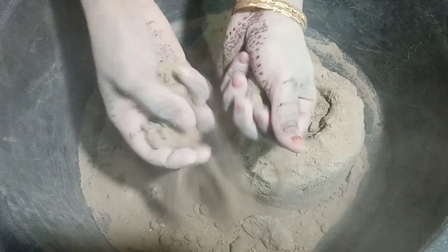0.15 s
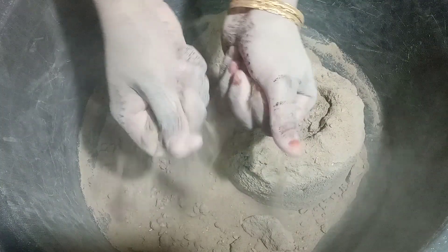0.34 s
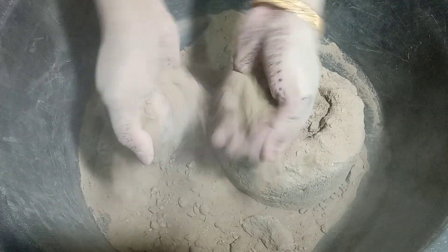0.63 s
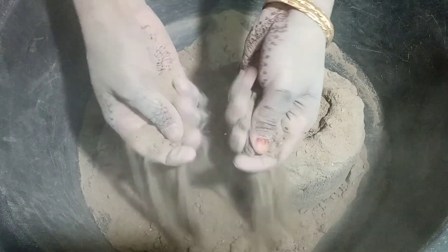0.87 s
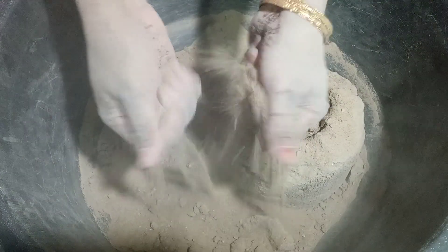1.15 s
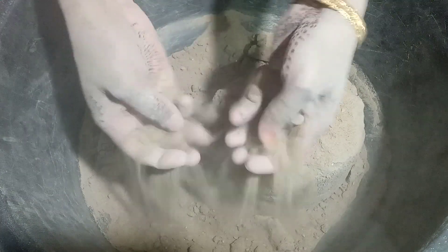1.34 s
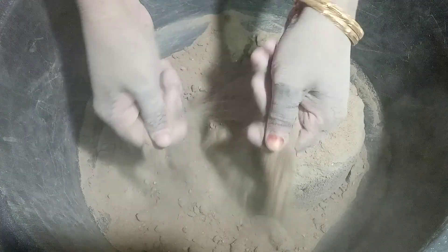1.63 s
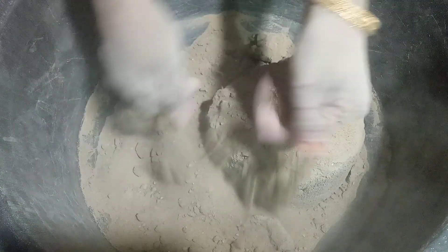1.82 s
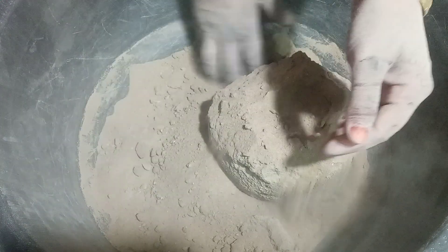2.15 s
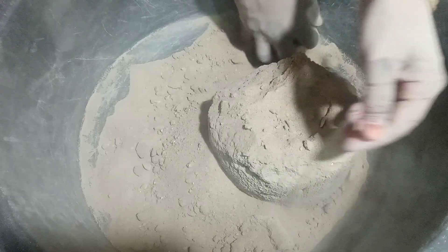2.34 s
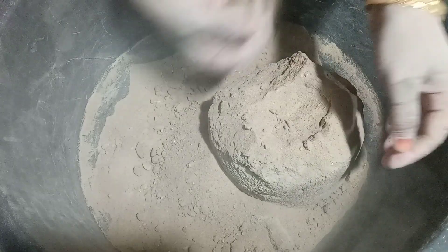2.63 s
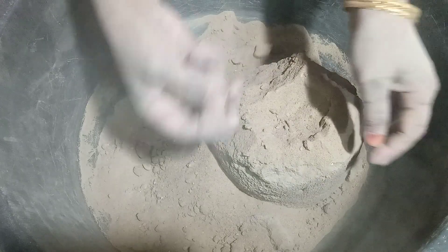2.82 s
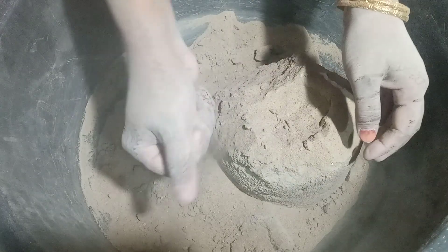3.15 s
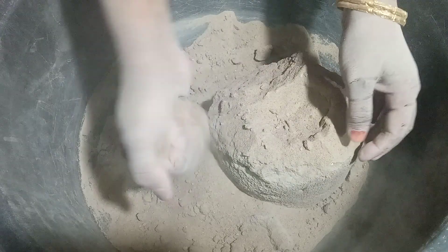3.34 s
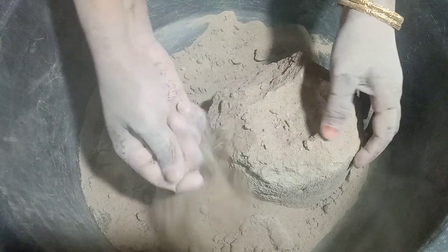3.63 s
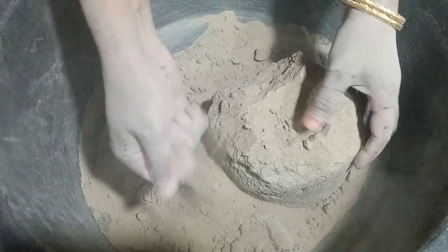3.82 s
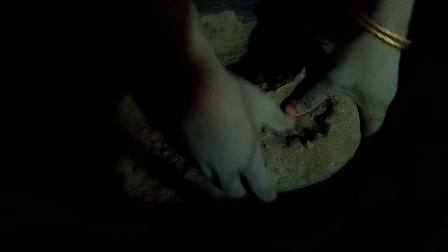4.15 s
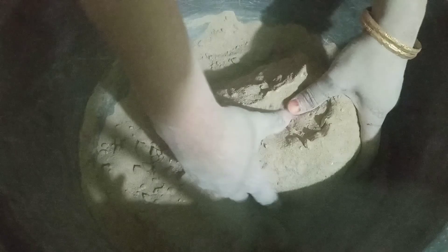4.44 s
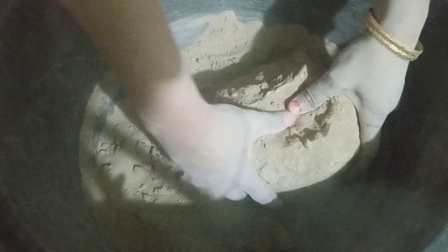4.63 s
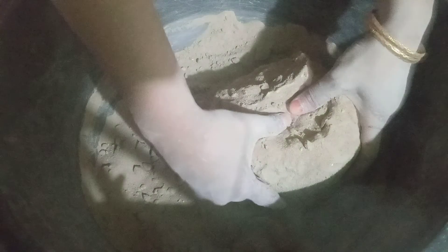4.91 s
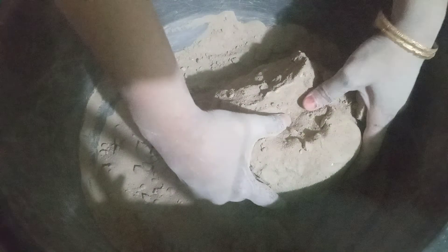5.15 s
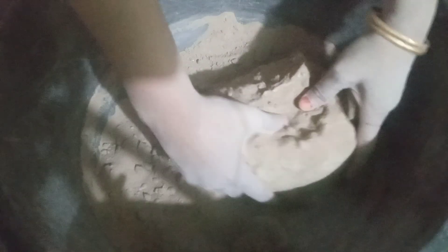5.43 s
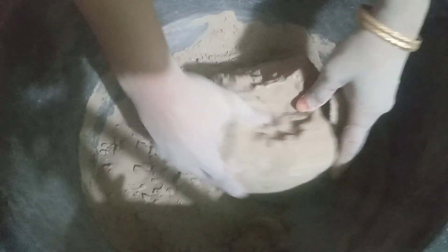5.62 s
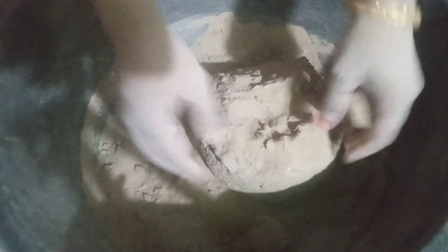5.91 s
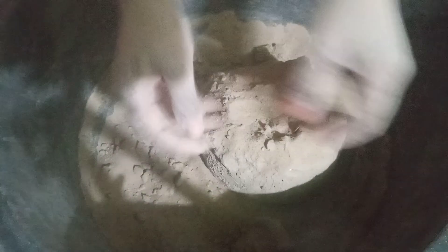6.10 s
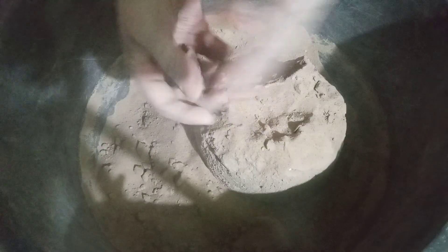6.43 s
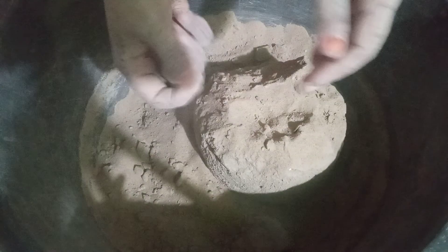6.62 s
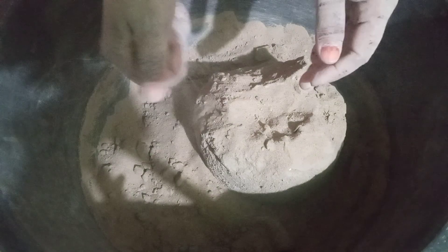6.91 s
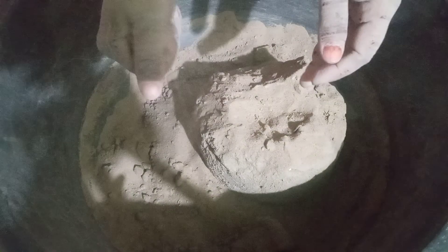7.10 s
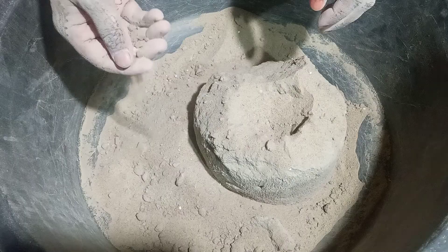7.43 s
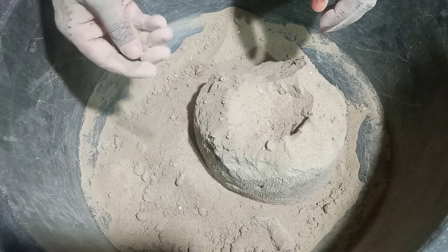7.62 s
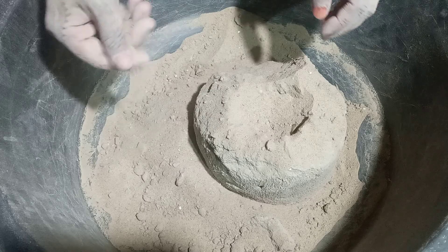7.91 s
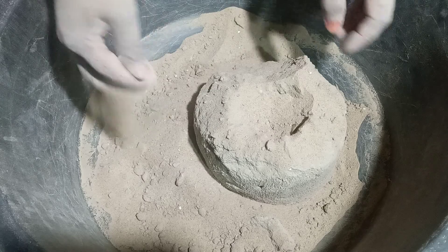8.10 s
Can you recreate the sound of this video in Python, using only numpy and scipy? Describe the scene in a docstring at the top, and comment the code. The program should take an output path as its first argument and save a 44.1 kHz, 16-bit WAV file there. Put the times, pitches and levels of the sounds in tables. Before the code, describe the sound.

Dry grit sifts between two palms in uneven bright swishes, with crumbs pattering and a few hard lump knocks ringing a plastic tub. The patter is thickest just after two seconds, then thins to light rubbing. Near five seconds comes a dense cluster of cracks and dull thuds, then delicate brushing, near silence and one small tick. Close indoor pickup, very short reverberation, low steady hum.

```python
"""Hands crumble dry sand over a plastic tub in a quiet room, close to a small microphone.
Fine grit hisses between the palms and crumbs patter on the heap: both are clumped random clicks,
coloured by filters and swelling with each move. Lumps crack in short bursts of slips that ring the tub,
and smooth pushes thump its low modes. A low room hum of drifting noise lies underneath."""
import sys
import numpy as np
from scipy import signal
from scipy.io import wavfile
from scipy.ndimage import uniform_filter1d

SR = 44100
rng = np.random.default_rng(int(sys.argv[2]) if len(sys.argv) > 2 else 0)


def gain_from_db(level_db):
    """Convert decibel levels to linear amplitude factors (20 dB per decade)."""
    decades = np.asarray(level_db, float) / 20
    return 10 ** decades


def store_wav(level_fs):
    """Save 16-bit WAV to argv[1]."""
    pcm = np.round(np.clip(np.atleast_2d(level_fs), -1, 1) * 32767)
    wavfile.write(sys.argv[1], SR, pcm.T.astype(np.int16))


N = 364258  # samples

# lumps that crack or land: start_s, peak_db, ring_pitch_hz, gritty_tick_db (against the peak)
LUMP_CRACKS = [(0.345, -24, 1180, -3.5), (.347, -14.5, 1050, -25), (0.365, -25.5, 962, -17.5),
               (0.619, -33.5, 1600, -3.5), (.677, -35.5, 1270, -11), (.689, -39, 1300, -5.5),
               (0.731, -40.5, 1390, -30), (0.84, -44, 2020, 0), (0.95, -43, 1520, -25),
               (1.223, -66, 1500, 14), (1.366, -28, 1000, -31), (1.453, -48, 2430, 10),
               (1.471, -32, 1400, -3.5), (1.496, -40.5, 1070, -4.5), (1.751, -33, 1570, -6),
               (1.84, -43.5, 1400, 1.5), (1.884, -42.5, 2100, 7), (1.939, -36, 1270, 4.5),
               (1.969, -31.5, 1185, -8), (2.009, -14.5, 1270, -26), (2.066, -37, 2500, -10),
               (2.221, -22.5, 885, -6), (2.464, -42.5, 1270, -25), (2.495, -39, 1830, -5),
               (2.504, -26.5, 1600, -2.5), (2.507, -29, 573, -30), (2.523, -39.5, 1590, 4),
               (2.564, -29.5, 750, -2), (2.578, -30.5, 695, -4.5), (2.872, -42.5, 1900, -2),
               (2.889, -44, 2140, -1), (2.91, -46, 1860, -4), (3.048, -38.5, 1600, -2),
               (3.537, -35.5, 950, 3), (4.155, -45, 980, 2.5), (4.288, -37.5, 1270, -1),
               (4.315, -41, 1510, 1), (4.446, -51, 950, -3), (4.515, -46, 1200, -1), (4.522, -50, 950, 0),
               (4.558, -45.5, 987, -12), (4.779, -46, 1050, -1), (4.838, -15, 2330, -27.5),
               (4.842, -17, 2000, -2.5), (4.846, -19, 910, -1), (4.887, -29, 1596, -21),
               (4.901, -30, 940, -4), (4.935, -22, 783, -12), (4.951, -37.5, 1890, 0),
               (4.973, -38.5, 2300, 1.5), (5.009, -21.5, 1930, -8.5), (5.011, -16, 840, -17),
               (5.043, -56, 2900, -14), (5.05, -42, 1460, -3), (5.064, -40, 1920, -5), (5.089, -41, 980, 3),
               (5.152, -38, 1630, 0.5), (5.175, -36.5, 2250, -12), (5.357, -49, 2100, -7),
               (5.435, -41, 1270, -20), (5.456, -37, 1790, 0), (7.16, -63.5, 1800, 2),
               (7.671, -79, 2900, 28), (7.99, -32.5, 3160, 2), (7.99, -36.5, 1806, -24),
               (7.99, -38.5, 940, -16), (8.037, -43.5, 1450, -35), (8.136, -43, 2200, 1)]
# dull pushes on the tub: start_s, peak_db, pitch_hz, push_length_ms
TUB_PUSHES = [(0.521, -32.5, 227, 0.25), (1.334, -36, 290, 0.48), (4.801, -33, 297.3, .5),
              (4.81, -18, 202.4, 0.7), (4.838, -20, 300.6, .5), (4.848, -16, 247, 0.6),
              (4.851, -21, 95, 1.8), (4.867, -22.5, 200, 1.2), (4.901, -9.5, 180, 0.5),
              (4.911, -22, 300, .6), (5.012, -28, 163.3, 1.5)]
# modes of the tub with its heap: frequency_hz, level_db, t60_s (before any added damping)
TUB_MODES = [(95, -5, 0.29), (144.3, -15, 0.2), (180, 6.5, 0.025), (335, 2, 0.039), (463.7, -3.5, 0.036),
             (586.3, 2, 0.038), (830, -10, 0.019), (950, 4, 0.049), (1270, 12, 0.025), (1520, 5, 0.03),
             (1936, -2, 0.064), (2150, 0.5, 0.016), (3000, 17.5, 0.003526), (3494, 0, 0.012)]
# relative spectrum of grit, with the dip and high peak of the microphone port:
# frequency_hz, density_db (per Hz)
GRIT_SPECTRUM = [(900, -55.5), (1900, -27.5), (3400, -28), (4100, -20.5), (5000, -17), (6500, -15),
                 (7500, -21.5), (8500, -28.5), (9600, -20.5), (11000, -17), (13800, -15.5), (14600, -3.5),
                 (15700, 3), (16100, -17.5), (16900, -28), (17200, -47.5)]
# relative spectrum of crumbs on the soft heap: frequency_hz, density_db (per Hz)
CRUMB_SPECTRUM = [(200, -42), (400, -31.5), (540, -11), (760, -11.5), (1000, -4), (1600, -1), (2500, -6),
                  (3400, -17), (9000, -34)]
# relative spectrum of the room hum: frequency_hz, density_db (per Hz)
HUM_SPECTRUM = [(24, -53.5), (40, -24.5), (60, -11.5), (106, -8), (144, -6), (372, -16), (422, -23),
                (600, -28), (790, -64), (873, -42), (2000, -68), (2770, -71), (16000, -76.5)]
# moves of the hands that rub, sift or spill sand: crest_s, rise_s, fall_s, grit_db, crumb_db
HAND_MOVES = [(0, .02, 0.014, -43.5, -40), (0.202, 0.78, 0.51, -51.5, -59.5),
              (.38, 0.017, 0.093, -60, -53.5), (0.49, 0.3, 0.13, -51, -63.5), (.8, 0.14, 0.077, -53, -60),
              (1.008, 0.28, 0.162, -45, -59.5), (1.223, .015, 0.026, -65.5, -62),
              (1.366, 0.13, 0.27, -54, -59.5), (1.599, 0.23, 0.12, -48, -63.5),
              (1.755, 0.017, 0.12, -60, -52), (1.879, .04, 0.58, -56.5, -59),
              (2.05, 0.044, 0.34, -51.5, -43), (2.202, 0.15, 0.22, -46.5, -37.5),
              (2.337, 0.054, 0.049, -47, -32), (2.379, 0.07, 0.013, -54, -41.5),
              (2.513, 0.0506, 0.22, -64, -61), (2.589, 0.067, 0.0071, -65.5, -49.5),
              (2.71, .04, 0.12, -54, -77.5), (2.841, 0.077, 0.1242, -45.5, -64),
              (2.98, 0.29, 0.2, -54.5, -60.5), (3.25, 0.32, 0.054, -53, -64), (3.36, 0.081, 0.09, -65, -77),
              (3.534, 0.11, 0.12, -51, -61), (3.708, 0.17, 0.074, -46.5, -65.5), (3.9, 0.14, 0.1, -69, -69),
              (4.068, 0.19, 0.43, -68, -66), (4.311, 0.052, 0.46, -69, -64.5),
              (4.52, 0.044, 0.3, -79.5, -74.5), (4.812, 0.015, 0.037, -43, -49),
              (4.871, 0.081, 0.18, -56, -48.5), (5.024, 0.022, 0.073, -69, -57.5),
              (5.08, 0.074, 0.077, -69.5, -59), (5.182, 0.06, 0.31, -71, -64.5),
              (5.288, .08, 0.19, -61, -67), (5.373, 0.067, 0.36, -63, -52), (5.528, 0.11, 0.16, -54, -49),
              (5.76, 0.26, 0.12, -67, -69.5), (6.13, 0.023, .05, -67.5, -99), (6.2, 0.45, 0.37, -75, -92),
              (6.575, 0.008, 0.24, -57.5, -85), (6.72, 0.016, 0.0583, -56, -73.5),
              (6.772, 0.015, 0.066, -58, -70.5), (6.829, 0.0088, 0.047, -56.5, -70),
              (6.875, 0.014, 0.11, -60, -76), (6.965, 0.0067, 0.041, -65, -83.5),
              (7.1, 0.14, 0.063, -60.5, -83), (7.152, 0.15, 0.007, -67.5, -81),
              (7.681, .06, 0.05, -70, -88.5), (7.743, .025, 0.026, -60.5, -98), (7.8, .06, 0.17, -79, -83),
              (8.009, 0.023, 0.15, -81, -69.5)]
# resonances in the hollow of the cupped hand: frequency_hz, level_db
HOLLOW_MODES = [(1160, -4), (2000, 6), (3340, -3), (4080, -3)]

HUM_DB = -58.5
STEADY_LIMIT_HZ = 15830  # upper band limit for steady sounds; sharp hits are left unfiltered by it
FLANK_DB, FLANK_BEND = 23.5, 1.64  # a move is this far down one rise before and one fall after its crest
REST_GRIT_DB, REST_CRUMB_DB = -88.5, -93  # sand that keeps trickling between moves
WALL_FULL_DB = -48  # crumbs louder than this pile on sand and drive the low wall mode no harder
# above this crumb level a bright crunch and a deeper knock grow, dB per dB
CRUNCH_FROM_DB, CRUNCH_GAIN, CRUNCH_BAND_HZ = -55.5, 0.6, (2300, 3700)
BREAK_MS, BREAK_SPREAD = 2.31, 0.18  # typical decay time of the slips, and its log-normal spread
LUMP_SHARE, LUMP_CYCLES = 0.59, 11  # lump's own note against the tub ring; cycles to fall by 60 dB
HOLLOW_FROM_S, HOLLOW_TO_S = 6.71, 7.16
HOLLOW_WIDTH_HZ, HOLLOW_DB = 110, -13  # resonance bandwidth; level against the grit


def evened(x):
    """Normalization: scale a signal to unit rms."""
    return x / np.sqrt(np.mean(x ** 2) + 1e-20)


def causal(points, size=4096):
    """Minimum phase: the Hilbert transform of log gain gives the phase of a causal impulse response."""
    f, db = np.transpose(points)
    hz = abs(np.fft.fftfreq(size, 1 / SR))
    level_db = np.interp(np.log(hz + 1), np.log(f + 1), db)
    log_gain = np.log(gain_from_db(np.maximum(level_db, -100)))
    phase = -signal.hilbert(log_gain).imag
    return np.fft.ifft(np.exp(log_gain + 1j * phase)).real[:size // 2]


def add(mix, start_s, sound):
    """Superposition: add a sound to the mix in place, cut at the end."""
    part = mix[round(start_s * SR):][:len(sound)]
    part += sound[:len(part)]


def grains(per_s, spread_db, clump_db, clump_ms):
    """Shot noise: random clicks of random sign and size, strengthened and weakened in clumps."""
    struck = rng.random(N) < per_s / SR
    strength = rng.standard_normal(N)
    size = np.minimum(rng.exponential(1, N), 4)
    memory = np.exp(-1000 / (clump_ms * SR))
    clumps = evened(signal.lfilter([1], [1, -memory], rng.standard_normal(N)))
    return evened(struck * strength * gain_from_db(spread_db * size + clump_db * clumps))


def tub(hz, octaves, damping, weights):
    """Modal synthesis: a click excites modes near hz most; sand on the spot scales their damping."""
    f, db, t60 = np.transpose(TUB_MODES)[:, :, None]
    t = np.arange(SR // 8) / SR
    near = np.exp(-0.5 * (np.log2(f / hz) / octaves) ** 2)
    decay = gain_from_db(db - 60 * damping * t / t60)
    modes = weights[:, None] * near * decay * np.sin(2 * np.pi * f * t)
    return modes.sum(0)


def patchy(x, patch_db):
    """Time-frequency modulation: random broad patches, and narrow streaks like a noise suppressor's."""
    z = signal.stft(x, nperseg=512)[2]
    patches, streaks = rng.standard_normal(z.shape[::-1] + (2,)).T
    patches = evened(uniform_filter1d(uniform_filter1d(patches, size=18, axis=0), size=7, axis=1))
    # streaks are narrower in frequency and last longer
    streaks = evened(uniform_filter1d(uniform_filter1d(streaks, size=2, axis=0), size=12, axis=1))
    drifting = z * gain_from_db(patch_db * patches + 2.2 * streaks)
    return evened(signal.istft(drifting, nperseg=512)[1][:N])


def effort():
    """Power addition: moves swell to a crest and die away; overlaps add. Returns grit and crumb dB."""
    crest, rise, fall, grit_db, crumb_db = np.transpose(HAND_MOVES)[:, :, None]
    t = np.arange(0, N + 64, 64) / SR
    away = np.where(t < crest, (crest - t) / rise, (t - crest) / fall)
    power_shape = gain_from_db(-2 * FLANK_DB * away ** FLANK_BEND)
    levels = []
    for crest_db, rest_db in ((grit_db, REST_GRIT_DB), (crumb_db, REST_CRUMB_DB)):
        power = (gain_from_db(2 * crest_db) * power_shape).sum(0) + gain_from_db(2 * rest_db)
        levels.append(np.interp(np.arange(N) / SR, t, 10 * np.log10(power)))
    return levels


def flow():
    """Filtered shot noise: dense grit hisses; coarser crumbs patter and ring the tub at several spots."""
    grit_db, crumb_db = effort()
    # a few coarse specks tick out of the hiss, some larger crumbs stand out of the patter
    specks = grains(14000, 1.5, 2.6, 9) + 0.2 * grains(120, 4, 3, 30)
    crumbs = grains(3500, 2.8, 2.3, 4) + 0.2 * grains(90, 4, 3, 30)
    grit = patchy(signal.oaconvolve(specks, causal(GRIT_SPECTRUM))[:N], 0.84)
    heap = patchy(signal.oaconvolve(crumbs, causal(CRUMB_SPECTRUM))[:N], 2.0)

    rings = []
    for hz in (540, 840, 1110, 1520, 2380):
        spot = tub(hz, 0.37 * min(1, hz / 900), 0.95, rng.choice([-1., 1.], len(TUB_MODES)))
        rings.append(evened(signal.oaconvolve(grains(1600, 2.2, 2.5, 10), spot)[:N]))
    low, deep, *high = rings
    # crumbs that outweigh the grit drive the low wall mode harder, until the wall is covered
    coarse_db = 0.69 * np.clip(crumb_db - grit_db, -20, 10) - np.maximum(crumb_db - WALL_FULL_DB, 0)

    crunch = evened(signal.lfilter(*signal.butter(2, CRUNCH_BAND_HZ, "band", fs=SR), crumbs))
    crunch_db = -19.5 + CRUNCH_GAIN * np.clip(crumb_db - CRUNCH_FROM_DB, 0, 16)
    heap = heap + gain_from_db(crunch_db) * (crunch + 0.9 * deep)
    patter = evened(heap + 0.25 * sum(high) + 0.58 * gain_from_db(coarse_db) * low)
    return gain_from_db(grit_db) * (grit + hollow(specks)) + gain_from_db(crumb_db) * patter


def hum():
    """Spectral synthesis: steady low noise from random Fourier bins, with drifting patches."""
    real, imag, patches = rng.standard_normal((N // 512 + 5, 1025, 3)).T
    patches = evened(uniform_filter1d(uniform_filter1d(patches, size=3, axis=0), size=5, axis=1))
    f, db = np.transpose(HUM_SPECTRUM)
    shape_db = np.interp(np.log(np.fft.rfftfreq(2048, 1 / SR) + 1), np.log(f + 1), db)
    z = (real + 1j * imag) * gain_from_db(shape_db[:, None] + 2.0 * patches)
    return gain_from_db(HUM_DB) * evened(signal.istft(z, nperseg=2048, noverlap=1536)[1][:N])


def cracks():
    """Brittle fracture: a burst of slips excites a dry snap, a damped ring and a gritty tick."""
    out = np.zeros(N)
    t = np.arange(SR // 20) / SR
    grit, snap = causal(GRIT_SPECTRUM), causal(CRUMB_SPECTRUM)
    for start_s, db, hz, tick_db in LUMP_CRACKS:
        break_ms = BREAK_MS * np.exp(BREAK_SPREAD * rng.standard_normal())
        fade = np.exp(-1000 * t / break_ms)
        slips = rng.standard_normal(len(t)) ** 3 * fade
        spray = rng.standard_normal(len(t)) * fade ** 2
        slips[0], spray[0] = 14, 5  # a strong first break

        ring = tub(hz, 0.44, 2.2, 1 + rng.standard_normal(len(TUB_MODES)) / 4)
        lump = gain_from_db(-60 * t * hz / LUMP_CYCLES) * np.sin(2 * np.pi * hz * t)
        ring[:len(t)] += LUMP_SHARE * abs(ring).max() * lump
        ring[:len(snap)] += 0.5 * snap / abs(snap).max() * abs(ring).max()

        band = signal.butter(2, [hz / 1.5, hz * 3.2], "band", fs=SR)
        knock = signal.lfilter(*band, signal.fftconvolve(slips, ring))
        tick = signal.fftconvolve(spray, grit)
        add(out, start_s, gain_from_db(db) * knock / abs(knock).max())
        add(out, start_s, gain_from_db(db + tick_db) * tick / abs(tick).max())
    return out


def room(x, t60=0.086):
    """Diffuse reverberation: exponentially decaying noise as the short tail of tub walls and room."""
    t = np.arange(SR // 4) / SR
    tail = rng.standard_normal(len(t)) * gain_from_db(-60 * t / t60) * (t > 0.003)
    return signal.oaconvolve(x, tail / np.linalg.norm(tail))[:N]


def thumps():
    """Forced excitation: a smooth push of the hand moves the low modes of the tub."""
    out = np.zeros(N)
    for start_s, db, hz, push_ms in TUB_PUSHES:
        push = -np.hanning(round(push_ms * SR / 1000))
        ring = np.convolve(push, tub(hz, 0.52, 1.6, np.ones(len(TUB_MODES))))
        add(out, start_s, gain_from_db(db) * ring / abs(ring).max())
    return out


def hollow(specks):
    """Cavity resonance: in a late, soft rub the grit rings the narrow modes of the cupped hand."""
    rings = np.zeros(N)
    for hz, db in HOLLOW_MODES:
        peak = signal.iirpeak(hz, hz / HOLLOW_WIDTH_HZ, SR)
        rings += gain_from_db(db) * evened(signal.lfilter(*peak, specks))
    t = np.arange(N) / SR
    cupped = (t > HOLLOW_FROM_S) & (t < HOLLOW_TO_S)
    return gain_from_db(HOLLOW_DB) * patchy(rings, 4.5) * cupped


def scene():
    """Superposition: sand flow and hum below an upper band limit, cracks with room tail, and thumps."""
    lowpass = signal.firwin(301, STEADY_LIMIT_HZ, window=("kaiser", 8), fs=SR)
    steady = signal.oaconvolve(flow() + hum(), lowpass, "same")
    knocks = cracks()
    return (steady + knocks + gain_from_db(-19.5) * room(knocks) + thumps())[None]


def top_cut(x):
    """Nothing passes above the cut-off."""
    return signal.sosfilt(signal.butter(12, 17140, fs=SR, output="sos"), x)


def record(dry):
    """High-pass response: the microphone drops the deepest bass."""
    bass_cut = signal.butter(4, 68, "high", fs=SR, output="sos")
    mix = signal.sosfilt(bass_cut, dry)
    return top_cut(mix)


dry = scene()
out = record(dry)
store_wav(out)
```